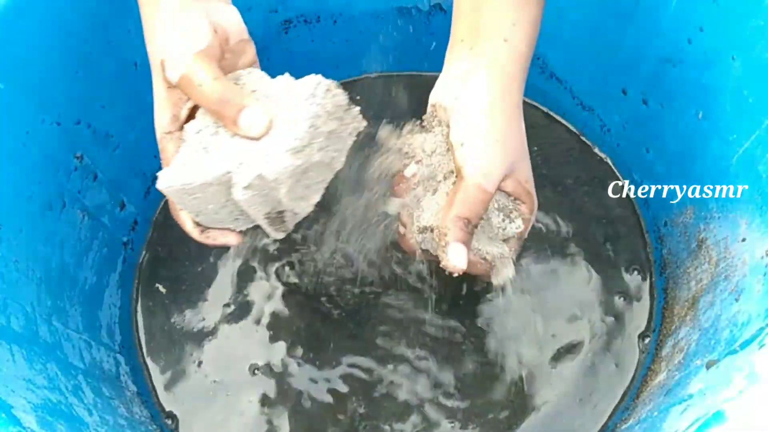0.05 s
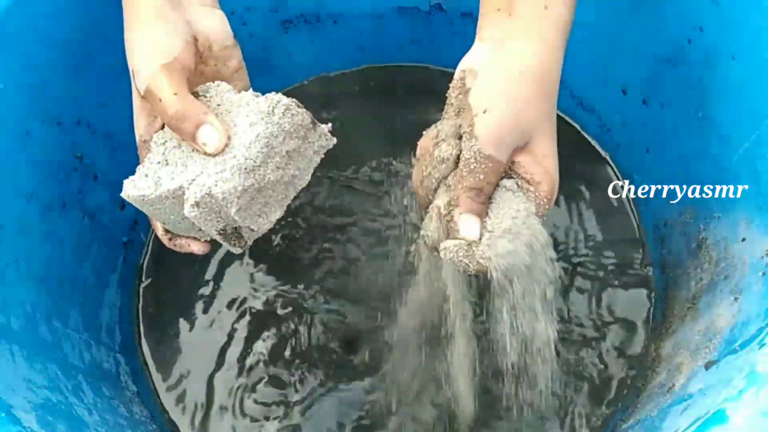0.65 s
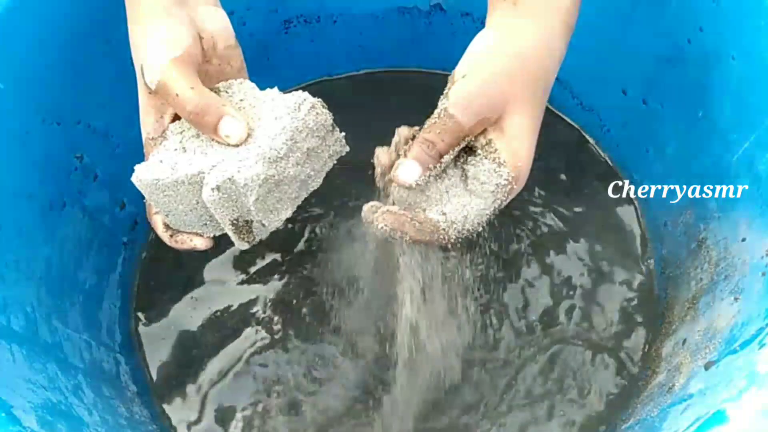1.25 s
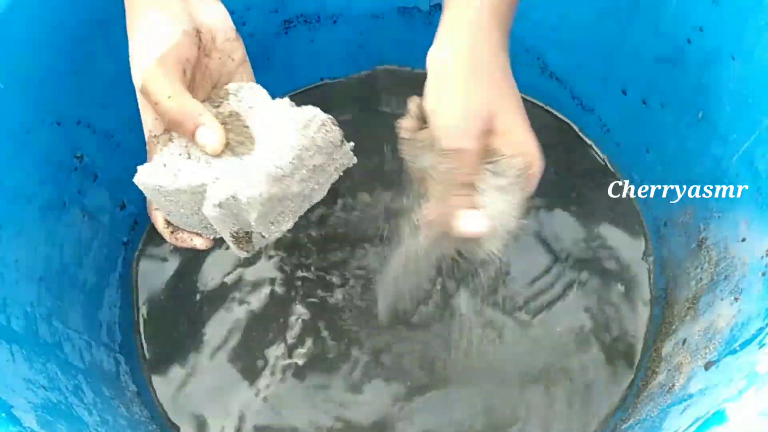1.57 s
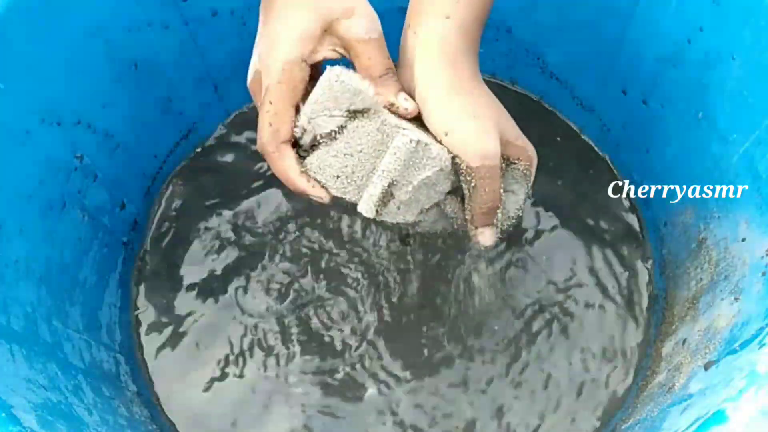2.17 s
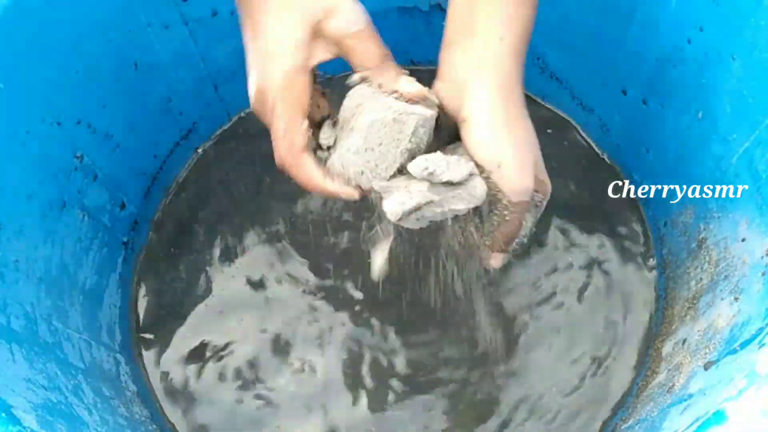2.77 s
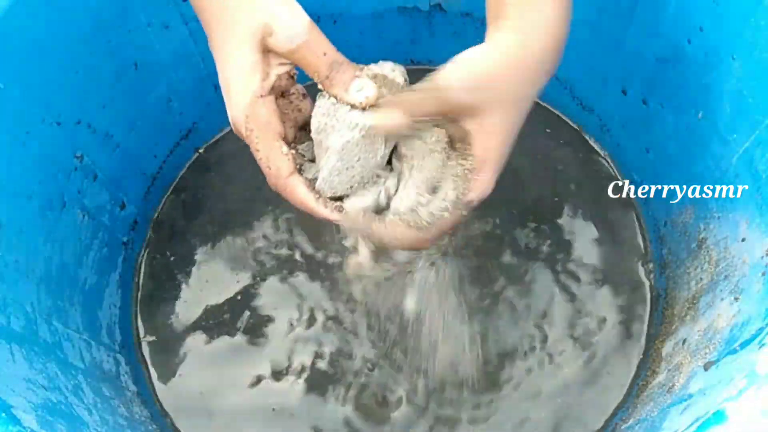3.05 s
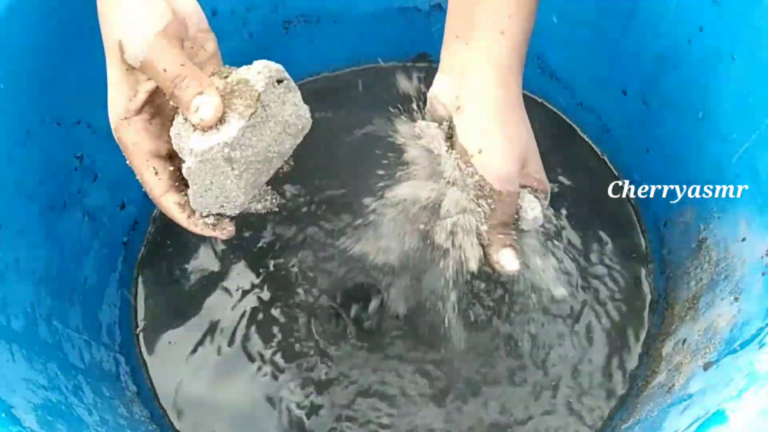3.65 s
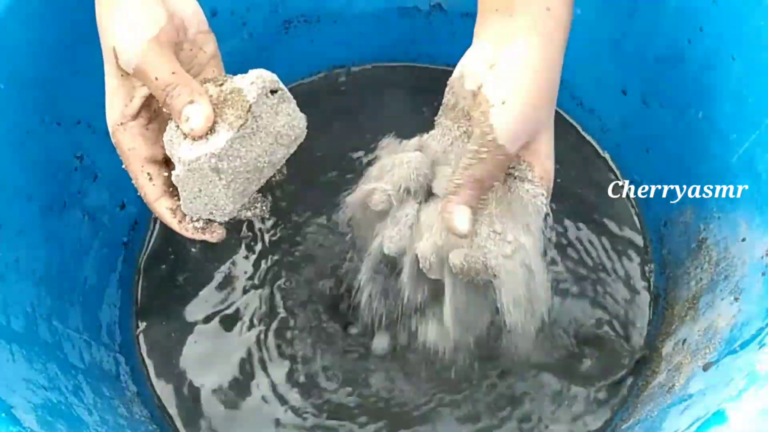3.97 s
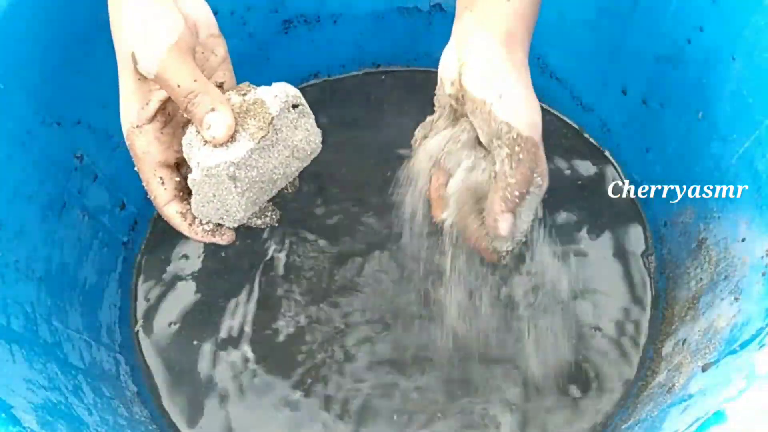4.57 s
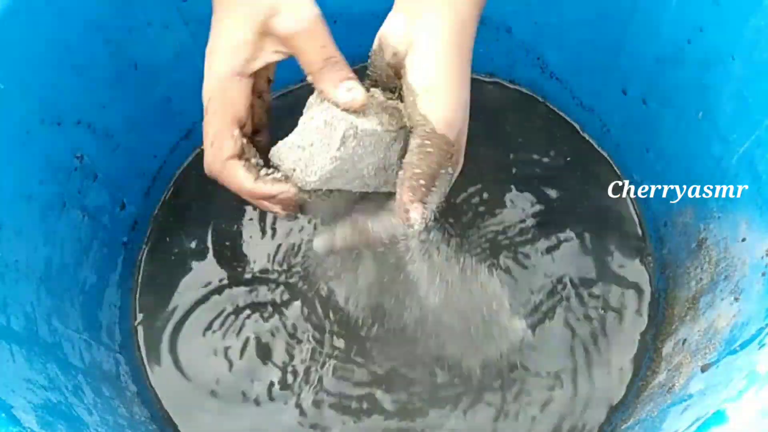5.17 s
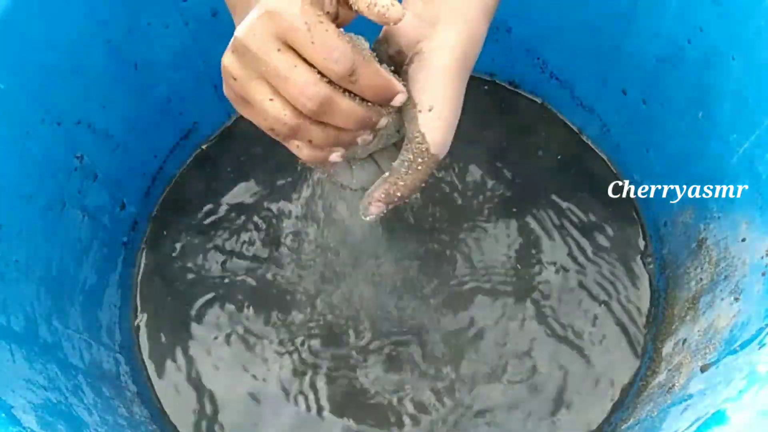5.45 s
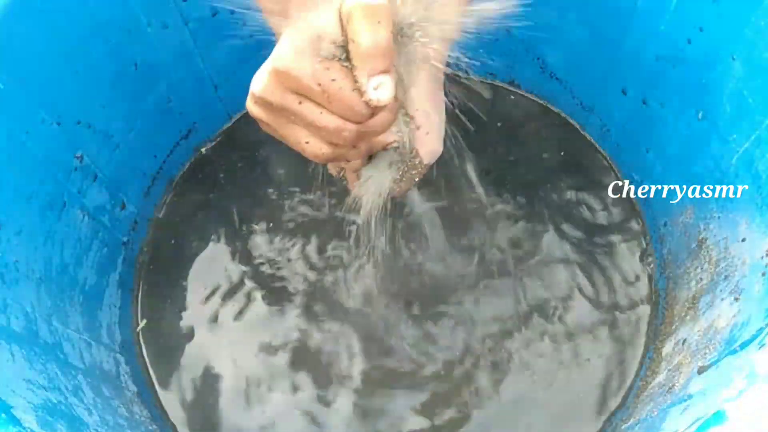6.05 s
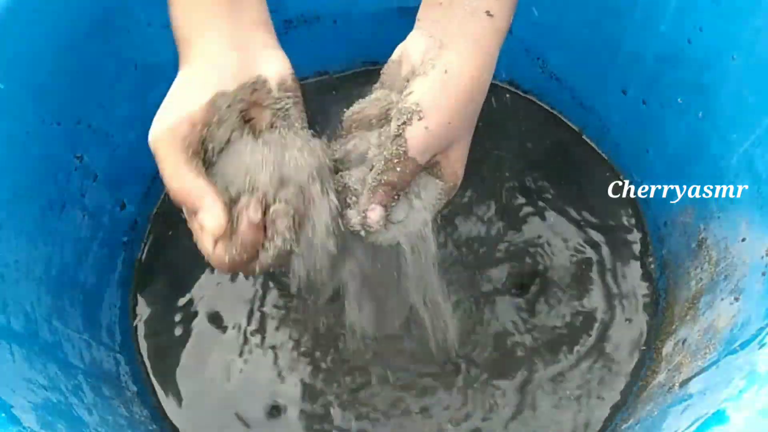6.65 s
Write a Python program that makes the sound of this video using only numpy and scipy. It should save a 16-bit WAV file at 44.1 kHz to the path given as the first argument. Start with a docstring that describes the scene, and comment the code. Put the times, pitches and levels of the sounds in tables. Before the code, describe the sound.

Hands crumble a block of sandy cement over a big plastic tub of water, close to the microphone. It opens with gritty crunches and sand pattering on the water. At about 0.4 seconds a large chunk slaps in and sets the tub booming, the loudest moment, and a lighter thump and plop follow at 0.6. Sand then falls in short fizzing pours, one with each squeeze, among tiny sharp snaps and crumbs plopping in. The sound thins around 2 seconds, and at 2.8 the block breaks with a short hollow knock. From 3.3 to 4.5 seconds the crunching, wet splats and rushes of sand grow busier. After a quieter stretch of trickling and scattered plops, more crunching and pouring run from about 5.8 seconds to the end, near 7. The tub adds a slight hollow echo, and a faint low outdoor rumble continues throughout.

```python
"""Sand patters and fizzes on water as hands crumble a block of sandy cement over a big plastic tub.
Almost at once a large chunk thumps the tub and sets it ringing, and a lighter one follows. Close to the
microphone the block crunches and snaps, each squeeze lets go more sand, and crumbs plop in, trapping
bubbles that ring. The tub's hollow echoes the crumbling and splashing over a low outdoor rumble."""
import sys
import numpy as np
from scipy import signal
from scipy.fft import rfft, irfft
from scipy.io import wavfile
from scipy.ndimage import uniform_filter1d

SR = 44100
rng = np.random.default_rng(int(sys.argv[2]) if len(sys.argv) > 2 else 0)


def log_audio(samples):
    """Write samples as a 16-bit WAV file to the path given in sys.argv[1]."""
    # one column per channel
    frames = np.atleast_2d(samples).T
    # limit to full scale, then quantise
    limited = np.clip(frames, -1, 1)
    pcm = np.round(limited * 32767).astype(np.int16)
    wavfile.write(sys.argv[1], SR, pcm)


N = 304731
T = np.arange(N) / SR


def undb(db):
    """Decibels to gain."""
    return 10 ** (np.asarray(db) / 20)


def unit(x):
    """Scale to rms 1."""
    return x / np.sqrt(np.mean(x ** 2) + 1e-18)


def seconds(length):
    """A time axis of the given length."""
    return np.arange(max(int(length * SR), 8)) / SR


def add(track, start, sound):
    """Mix a sound into the track at a start time in seconds."""
    i = int(np.clip(round(start * SR), 0, N - 1))
    track[i:i + len(sound)] += sound[:N - i]


def fade(t, t60):
    """Exponential decay by 60 dB in t60 seconds."""
    return np.exp(-np.log(1000) * t / max(t60, 1e-4))


def colour(x, points, size=1024):
    """Causal filter of unit energy with the given (Hz, dB) spectrum; the tail is kept."""
    hz, db = np.transpose(points)
    bin_hz = np.fft.rfftfreq(size, 1 / SR)
    curve_db = np.interp(np.log(bin_hz + 1), np.log(hz), db)
    cepstrum = irfft(np.log(undb(curve_db)))
    cepstrum[1:size // 2] *= 2  # fold to minimum phase, so attacks stay sharp
    cepstrum[size // 2 + 1:] = 0
    response = irfft(np.exp(rfft(cepstrum)))
    return signal.fftconvolve(x, response / np.linalg.norm(response))


def walk(rate):
    """Smooth random wandering at rms 1, with rate turns a second."""
    hold = max(int(SR / rate), 2)
    steps = np.repeat(rng.standard_normal(N // hold + 1), hold)
    return unit(uniform_filter1d(steps, hold)[:N])


def grains(n, rate, spread_db):
    """Random clicks, many small and a few large, at rms 1; the rate may change with time."""
    falls = rng.random(n) < rate / SR
    sizes = undb(spread_db * np.minimum(rng.exponential(size=n), 6))
    return unit(falls * sizes * rng.choice([-1, 1], n) / np.sqrt(rate))


def burst(length, points, rate=9000, spread_db=2, vary_db=3):
    """A quick swell of clicks; no two bursts have quite the same colour."""
    t = seconds(3 * length)
    age = t / (0.36 * length)  # 1 at the crest
    spectrum = [(hz, db + vary_db * rng.standard_normal()) for hz, db in points]
    return colour(age * np.exp(1 - age) * grains(len(t), rate, spread_db), spectrum)


def ping(hz, ring, glide, onset, hold=1.695):
    """A ring that dies ever faster; with glide it rises in pitch like a bubble nearing the surface."""
    t = seconds(ring)
    phase = 2 * np.pi * hz * (t + glide * t ** 2 / (2 * ring))
    decay = np.exp(-np.log(1000) * (t / ring) ** hold)
    return np.sin(phase) * decay * (1 - np.exp(-t / onset))


# The tub's hollow tone. Each row: pitch in Hz, level in dB, seconds to fall 60 dB.
AIR_MODES = [(570, -1.5, 0.051), (954, -1, 0.075), (1225, -9, 0.12), (1516, 4.5, 0.011), (1940, 6, 0.0085)]


def hollow(t):
    """The ring of the air between the water and the wall."""
    return sum(undb(db) * np.cos(2 * np.pi * hz * t) * fade(t, t60) for hz, db, t60 in AIR_MODES)


# The bass-heavy outdoor bed. Each row: frequency in Hz, relative level in dB.
RUMBLE_SPECTRUM = [(20, -17), (33, -11.5), (52, -1.5), (85, 2.5), (115, -6), (145, -2.5), (210, -10),
                   (268, -8), (320, -17), (410, -28), (570, -22), (780, -34), (1200, -31.5), (3000, -43.5),
                   (10000, -44), (16000, -57)]


def outdoors(rumble_db=-40, hollow_db=-65, whine_hz=1225, whine_db=-63.5):
    """A low rumble booms in the tub and the hollow hums; a faint thin whine swells and eases."""
    rumble = unit(colour(rng.standard_normal(N), RUMBLE_SPECTRUM, size=8192)[:N])
    rumble *= undb(0.8 * walk(5))
    air = unit(signal.fftconvolve(rng.standard_normal(N), hollow(seconds(.5)))[:N])
    whine = np.sin(2 * np.pi * np.cumsum(whine_hz + 4 * walk(26)) / SR)
    whine *= np.interp(T, [1.2, 1.8, 3.3, 3.9], [0.36, 0.9, 1.0, 0.6])
    return undb(rumble_db) * rumble + undb(hollow_db) * air + undb(whine_db) * whine


def tub_echo(x, hollow_db=-47, tail_db=-15, tail_t60=0.019):
    """Near walls give air resonances and a short diffuse tail."""
    t = seconds(.15)
    tail = rng.standard_normal(len(t)) * fade(t, tail_t60) * (t > .003)
    response = undb(tail_db) * tail / np.linalg.norm(tail) + undb(hollow_db) * hollow(t)
    response[0] += 1  # the direct sound
    return signal.fftconvolve(x, response)[:N]


# One pour of sand for each squeeze of the hand. Each row: start in seconds, hold in seconds, flow in dB.
SAND_POURS = [(0.0, 0.089, -51), (0.274, 0.13, -52), (0.471, 0.081, -54.5), (0.67, 0.18, -55.5),
              (0.879, 0.2, -55.5), (1.36, 0.12, -63), (1.558, 0.13, -60.5), (1.95, 0.17, -61),
              (2.5, 0.023, -59), (2.639, 0.087, -62.5), (2.8, 0.11, -59.5), (3.03, 0.36, -64),
              (3.32, 0.2, -57.5), (3.499, 0.44, -53.5), (4.069, 0.04, -60.5), (4.229, 0.2, -55),
              (4.382, 0.19, -59), (4.68, 0.13, -70), (4.98, 0.24, -69.5), (5.37, 0.082, -64),
              (5.66, 0.24, -69), (5.87, 0.045, -57.5), (5.981, 0.18, -58), (6.272, 0.14, -51.5),
              (6.47, 0.14, -56), (6.719, 0.16, -55)]
FULL_FLOW_DB = -53.5


def sand_flow(attack_s=0.036, release_t60=0.21, dribble_db=-83):
    """The flow of sand, 1 for a full stream: each pour swells, holds and dies away to a dribble."""
    power = undb(dribble_db) ** 2
    for start, held, db in SAND_POURS:
        swell = np.clip(1 + (T - start) / attack_s, 0, 1)
        release = fade(np.maximum(T - start - held, 0), release_t60)
        power = power + (undb(db) * swell * release) ** 2
    return np.sqrt(power) / undb(FULL_FLOW_DB)


def stream(level, points, rate, spread_db, full_db=-54):
    """A stream of sand: a full one merges into hiss, a thin one parts into single grains."""
    grains_per_s = rate * (level / undb(full_db)) ** 1.2
    return level * colour(grains(N, grains_per_s, spread_db), points)[:N]


def small_bubbles(count, low_hz, high_hz, spread_db, cycles):
    """Coarse grains trap little bubbles of every size; the higher ones are fainter."""
    out = np.zeros(N)
    for when, pitch, strength in rng.random((count, 3)):
        hz = low_hz * (high_hz / low_hz) ** pitch
        db = -spread_db * np.log(strength + 0.094) - 6 * pitch
        add(out, when * N / SR, undb(db) * ping(hz, cycles / hz, glide=0.22, onset=0.000078))
    return unit(out)


# Three colours of sand on water: broad patter, airy trickle and wet midrange fizz.
# Each row: frequency in Hz, relative level in dB.
PATTER_SPECTRUM = [(600, -33), (1150, 1), (1550, 2.5), (2300, 0), (2900, -0.5), (4000, -0.5), (5200, 2),
                   (6500, -2), (8000, -11), (12000, -13), (16000, -28)]
TRICKLE_SPECTRUM = [(2000, -32.5), (5000, -15), (7500, 2), (9500, 3.5), (11000, -3), (13000, -18),
                    (16000, -33)]
FIZZ_SPECTRUM = [(350, -1.5), (560, 4.5), (780, -4), (960, 4), (1150, 0), (1600, -1), (2100, -4.5),
                 (2900, -10), (5000, -30.5)]


def sand(trickle_db=-59, fizz_db=-54, bubbles_db=-58, pings_db=-68, crackle_db=-68, clump_db=2.5):
    """Sand trickles off the fingers in clumps, patters on the water and makes it fizz and crackle."""
    flow = sand_flow()
    trickle, fizz, crackle = flow ** 0.52, flow ** 0.65, flow ** 0.26  # these linger as the stream thins
    out = stream(undb(FULL_FLOW_DB) * flow, PATTER_SPECTRUM, rate=9000, spread_db=3)
    out += stream(undb(trickle_db) * trickle, TRICKLE_SPECTRUM, rate=7000, spread_db=3)
    out += stream(undb(fizz_db) * fizz, FIZZ_SPECTRUM, rate=9000, spread_db=5.5)
    out *= undb(clump_db * walk(70))
    bubbles = small_bubbles(count=600, low_hz=1250, high_hz=3600, spread_db=4, cycles=16)
    pings = small_bubbles(count=900, low_hz=3900, high_hz=13000, spread_db=7, cycles=14)
    pops = small_bubbles(count=420, low_hz=4370, high_hz=12800, spread_db=9, cycles=25)
    out += undb(bubbles_db) * flow * bubbles
    out += undb(pings_db) * trickle * pings
    return out + undb(crackle_db) * crackle * pops


# Whole sheets of sand landing on the water. Each row: start in seconds, length in seconds, level in dB.
SAND_SHEETS = [(0.766, 0.35, -52.5), (1.476, 0.28, -50.5), (3.557, 0.37, -54), (4.316, 0.37, -51.5)]
# Their wet wash. Each row: frequency in Hz, relative level in dB.
RUSH_SPECTRUM = [(700, -9), (1200, 2.5), (1600, 6.5), (2100, -4), (3200, -6.5), (4300, -2.5), (5500, -1),
                 (6800, -7), (8000, -13), (10500, -11), (15000, -35)]


def rushes(swell_s=0.096, stop_s=0.072, flutter_db=1.5):
    """So many grains land at once that they merge into a smooth, wet rush."""
    level = np.zeros(N)
    for start, length, db in SAND_SHEETS:
        swell = np.clip((T - start) / swell_s, 0, 1)
        stop = np.clip((start + length - T) / stop_s, 0, 1)
        level += undb(db) * swell * stop
    flutter = undb(flutter_db * walk(40))
    return level * flutter * colour(rng.standard_normal(N), RUSH_SPECTRUM)[:N]


def stray_grit(count=190, db=-51, spread_db=5, tick_s=0.0018, low_hz=2900, flow_slope=0.29):
    """Single grains rub loose between the fingers and tick; fainter when little sand pours."""
    out, flow = np.zeros(N), sand_flow()
    for when, faintness, pitch in rng.random((count, 3)):
        hz = low_hz * 2 ** (2 * pitch)
        gain = undb(db - spread_db * np.log(faintness + .1)) * flow[int(when * N)] ** flow_slope
        add(out, when * N / SR, gain * burst(tick_s, [(hz / 2, -10), (hz, 0), (hz * 2, -20)]))
    return out


# The fist grinds a lump and sheds wet clots.
# Each row: start in seconds, length in seconds, typical splat level in dB.
FIST_GRINDS = [(0.659, 0.5, -55.5), (3.559, 0.4, -48.5), (6.24, 0.66, -50)]


def clots(per_s=42, spread_db=5.5, splat_s=0.0043, ring_db=8, ring_hz=1750, ring_s=0.0094):
    """Wet clots hit the water at uneven moments, each a gritty splat with a short ring."""
    out = np.zeros(N)
    for start, length, db in FIST_GRINDS:
        count = int(length * per_s)
        for k, (when, size, pitch) in enumerate(rng.random((count, 3))):
            at = start + (k + 2 * when) / per_s
            gain = undb(db + spread_db * (2 * size - 1))
            add(out, at, gain * burst(splat_s, PATTER_SPECTRUM))
            bubble = ping(ring_hz * 2 ** (pitch - .5), ring_s, glide=.2, onset=.0001)
            add(out, at, gain * undb(ring_db) * bubble)
    return out


# Grains of cement snapping off between the fingers. Each row: start in seconds, pitch in Hz, level in dB.
GRAIN_SNAPS = [(0.352, 10800, -27), (0.499, 4250, -27), (0.709, 7800, -32), (0.902, 13000, -36),
               (0.994, 12400, -34), (1.053, 8340, -36), (1.157, 5860, -36), (1.181, 12500, -36),
               (1.357, 5340, -34), (1.681, 3270, -37), (1.876, 4450, -35), (2.019, 7740, -35),
               (2.053, 6200, -36), (2.154, 3100, -34), (2.454, 6200, -33.5), (2.535, 6370, -38),
               (3.318, 9500, -36), (3.79, 7900, -23), (3.912, 9700, -36), (3.988, 5730, -37.5),
               (4.088, 5640, -30), (4.249, 9990, -34), (4.719, 5700, -37), (4.794, 6300, -31.5),
               (5.758, 4300, -36), (6.459, 7900, -36), (6.883, 4640, -30.5)]


def snaps(ring_s=0.0017, crack_db=-13, crack_s=0.0035, skirt_db=-13):
    """A grain breaks free with a tiny ring and a spray of cracks around the same pitch."""
    out = np.zeros(N)
    for start, hz, db in GRAIN_SNAPS:
        add(out, start, undb(db) * ping(hz, ring_s, glide=0, onset=0.00003))
        band = [(hz / 2, skirt_db), (hz, 0), (hz * 2, skirt_db)]
        add(out, start, undb(db + crack_db) * burst(crack_s, band))
    return out


def block_break(start_s=2.7925, hz=270, db=-23, ring_s=0.03):
    """The block breaks in two with a short, hollow knock between the cupped hands."""
    out = np.zeros(N)
    add(out, start_s, undb(db) * ping(hz, ring_s, glide=0, onset=0.00095))
    return out


# The bright edge of breaking grit. Each row: frequency in Hz, relative level in dB.
GRIT_SPECTRUM = [(800, -2.5), (2000, 2.5), (3500, 3), (6000, 3), (7500, -2), (9500, 0), (12000, -9.5),
                 (16000, -27)]
# The block gives way, or a pinch of it lands.
# Each row: start in seconds, length in seconds, level in dB, body offset in dB, both before the trims.
GRIT_BURSTS = [(0.165, 0.024, -47.5, -2), (0.208, 0.021, -47, 5.5), (0.262, 0.012, -37, 3.5),
               (0.349, 0.0059, -39, 8), (0.44, 0.0099, -57, 19), (0.458, 0.0065, -51, 21),
               (0.505, 0.004, -45, 15), (0.553, 0.0036, -41, 11), (0.995, 0.0023, -42, 11),
               (1.18, 0.0086, -51, 9.5), (1.353, 0.026, -52, 9), (1.445, 0.018, -47.5, 4.5),
               (2.067, 0.0051, -37, -12), (2.326, 0.03, -39.5, -23), (3.43, 0.014, -43, -14),
               (3.493, 0.013, -35, -5), (3.545, 0.0097, -41.5, 4), (3.694, 0.013, -40, -5),
               (3.745, 0.0075, -44, 5), (3.789, 0.0022, -43.5, 10), (4.043, 0.0053, -46.5, 4),
               (4.189, 0.002, -32.5, 4), (5.23, 0.062, -72.5, 18), (5.384, 0.0012, -38, -1),
               (5.783, 0.013, -50, 0), (5.851, 0.039, -44.5, 6), (6.11, 0.012, -37, -5.5),
               (6.233, 0.0088, -39.5, -2), (6.371, 0.016, -43.5, -3), (6.4, 0.018, -45, 9.5),
               (6.744, 0.0021, -40.5, 6)]


def crunches(treble_trim_db=2, body_trim_db=-0.5, snap_db=2, plain_s=0.011):
    """Bonds between sand grains break in bursts with a wet, hollow body; the shortest are brightest."""
    out = np.zeros(N)
    for start, length, db, body_db in GRIT_BURSTS:
        tilt = snap_db * max(np.log2(plain_s / length), 0)  # dB per octave
        grit = [(hz, level + tilt * np.log2(hz)) for hz, level in GRIT_SPECTRUM]
        add(out, start, undb(db + treble_trim_db) * burst(length, grit))
        add(out, start, undb(db + body_db + body_trim_db) * burst(length, FIZZ_SPECTRUM))
    return out


# The boom of the filled tub. Each row: pitch in Hz, relative level in dB, full ring time (t60) in seconds.
BODY_MODES = [(54.4, -18.5, 1), (142.5, -4, 0.28), (183, -7, 0.2), (278, -13.5, 0.22), (314, -17, 0.26),
              (379, -14, 0.19), (442, -7, 0.12), (507, -14.5, 0.14)]
# The dull slap on the water. Each row: frequency in Hz, relative level in dB.
SLAP_SPECTRUM = [(40, -46), (150, 4), (400, 14.5), (800, -7), (1500, -5), (2100, -9), (3000, -10),
                 (4500, -20.5), (8000, -38)]
# Heavy chunks landing. Each row: start in seconds, boom level in dB, contact time in seconds,
# share of the full ring time, slap level in dB.
CHUNK_HITS = [(0.3715, -4, 0.00096, 0.91, -12), (0.6272, -17.5, 0.0023, 0.44, -26.5)]


def knocks(slap_t60=0.078):
    """A heavy piece slaps the water and sets the whole tub ringing."""
    out, t = np.zeros(N), seconds(0.47)
    for start, db, contact, ring_share, slap_db in CHUNK_HITS:
        boom = np.zeros(len(t))
        for hz, mode_db, t60 in BODY_MODES:
            build_up = 1 - np.exp(-np.pi * hz * t)  # within the first cycle
            boom += undb(mode_db) * np.sin(2 * np.pi * hz * t) * build_up * fade(t, t60 * ring_share)
        push = np.hanning(len(seconds(contact)))  # a longer contact gives a duller thump
        add(out, start, -undb(db) * np.convolve(boom, push / push.sum()))
        slap = colour(rng.standard_normal(len(t)) * fade(t, slap_t60), SLAP_SPECTRUM)
        add(out, start, undb(slap_db) * slap)
    return out


def wobble(x, depth, wobble_s=0.0013):
    """Churning water makes a ring swell and dip unevenly."""
    churn = uniform_filter1d(rng.standard_normal(len(x)), max(int(wobble_s * SR), 2))
    return x * (1 + depth * unit(churn))


# Crumbs and droplets plopping in. Each row: start in seconds, bubble pitch in Hz, level in dB,
# ring time in seconds, rise over the ring as a share of the pitch.
CRUMB_PLOPS = [(0.0105, 1630, -35.5, 0.02, 0.15), (0.2645, 1430, -30.5, 0.013, 0.5),
               (0.3364, 1890, -25, 0.006, 0.35), (0.3733, 1290, -8, 0.0038, 0.34),
               (0.3719, 687, -12, 0.022, 1.48), (0.4617, 900, -34.5, 0.037, 0.15),
               (0.488, 1670, -20, 0.0038, 0.0057), (0.5087, 940, -24, 0.0069, 0.26),
               (0.5095, 1800, -25, 0.0028, 0.37), (0.5458, 1210, -32, 0.012, 0.06),
               (0.6072, 1450, -27.5, 0.023, 0.098), (0.6278, 1020, -15.5, 0.014, 0.3),
               (0.6291, 1790, -20, 0.0055, 0.088), (0.63, 507, -4, 0.018, 0.049),
               (0.8548, 2150, -33.5, 0.0075, 0.25), (1.028, 2310, -19.5, 0.0038, 0.41),
               (1.047, 980, -24, 0.008, 0.077), (1.0707, 1580, -30.5, 0.024, 0.41),
               (1.079, 1620, -26.5, 0.0082, 0.34), (1.111, 1510, -24.5, 0.0071, 0.21),
               (1.1299, 1720, -27.5, 0.0043, 0.1), (1.1828, 3640, -36.5, 0.0087, 0.14),
               (1.21, 4570, -38, 0.008, 0), (1.2174, 1480, -22, 0.0053, 0), (1.2182, 513, -22.5, 0.013, 0),
               (1.353, 970, -34, 0.013, 0.23), (1.4032, 1710, -31.5, 0.016, 0.071),
               (1.846, 1560, -35.5, 0.0098, 0.096), (1.9565, 2030, -32.5, 0.0052, 0.35),
               (2.034, 1620, -34.5, 0.0067, 0.31), (2.0692, 2090, -26.5, 0.0033, 0.67),
               (2.4559, 2040, -26.5, 0.0045, 0), (2.5288, 3000, -39.5, 0.0057, 0.094),
               (2.6241, 1760, -39, 0.017, 0.096), (3.0347, 2020, -35, 0.0071, 0.36),
               (3.0509, 1605, -19.5, 0.013, 0.23), (3.212, 2400, -32, 0.0055, 0.37),
               (3.2388, 2270, -36.0, 0.0032, 0.35), (3.309, 1950, -32, 0.004, 0.1),
               (3.3185, 1520, -15.5, 0.0052, 0.33), (3.3364, 1280, -17.5, 0.0096, 0.18),
               (3.338, 493, -17, 0.015, 0), (3.415, 2020, -27, 0.0043, 0.13),
               (3.4372, 1720, -28, 0.0071, 0.18), (3.5246, 1076, -25.5, 0.016, 0),
               (3.712, 852, -26, 0.031, 0.0038), (3.7342, 1580, -34, 0.0088, 0.7),
               (3.894, 1310, -23.5, 0.0079, 0), (3.9112, 1830, -23, 0.0024, 0.57),
               (3.9749, 1240, -39.5, 0.02, 0), (4.086, 1730, -28.5, 0.011, 0),
               (4.19, 1420, -18.5, 0.0053, 0), (4.249, 1570, -30, 0.0053, 0.2),
               (4.2644, 2100, -32, 0.012, 0.26), (4.267, 833, -23.5, 0.024, 0),
               (4.336, 1490, -22, 0.0058, 0.29), (4.3717, 2360, -27, 0.0049, 0.31),
               (4.6204, 2290, -33.0, 0.012, 0), (4.9145, 2070, -31.5, 0.0077, 0.32),
               (5.102, 1640, -31.5, 0.0055, 0.16), (5.237, 2370, -37.5, 0.0036, 0.38),
               (5.3504, 2400, -42, 0.02, 0.1), (5.3852, 1260, -24, 0.0067, 0.02),
               (5.4788, 1030, -22, 0.021, 0.082), (6.1126, 1540, -25.5, 0.0087, 0.24),
               (6.1428, 1590, -36, 0.026, 0.25), (6.3251, 970, -13.5, 0.01, 0.057),
               (6.3448, 1470, -22, 0.0037, 0.0024), (6.418, 950, -32, 0.018, 0),
               (6.4715, 1630, -19.5, 0.004, 0), (6.6501, 1047, -25, 0.014, 0.2),
               (6.6507, 470, -23, 0.021, 0), (6.714, 1640, -30, 0.0031, 0.41),
               (6.746, 1670, -31.5, 0.0077, 0.32), (6.8306, 2480, -34.5, 0.0044, 0.51)]


def plops():
    """Each crumb ticks, splashes, traps a bubble and a smaller twin, and leaves a crater to gulp shut."""
    onset_s, onset_hz, muffle_db = 0.0001, 1500, 5
    wall_near_s, wall_far_s, wall_db = 0.00268, 0.00459, -9.5
    twin_db, twin_ratio, twin_lag_s = -13, 1.165, 0.00402
    crater_db, crater_hz, crater_s = -17, 600, 0.015
    splash_db, splash_s = -16.5, 0.0063
    typical_plop_db, typical_tick_db, tick_slope, tick_s = -23, -43, 0.88, 0.0022
    lead_db, lead_s = -23, 0.0033
    out, chances = np.zeros(N), rng.random((len(CRUMB_PLOPS), 4))
    for (start, hz, db, ring, glide), (detune, lag, place, crater) in zip(CRUMB_PLOPS, chances):
        # big bubbles pinch off later and deeper, with less tick and splash
        onset = onset_s * (onset_hz / hz) ** 3
        surface_db = db + muffle_db * min(np.log2(hz / onset_hz), 0)
        plink = undb(db) * wobble(ping(hz, ring, glide, onset), depth=0.2)
        add(out, start, plink)
        # the wall throws the plop back, sooner or later depending on where the crumb lands
        echo_s = wall_near_s + place * (wall_far_s - wall_near_s)
        add(out, start + echo_s, undb(wall_db) * plink)
        twin = ping(hz * (twin_ratio + 0.3 * detune), ring, glide=0.22, onset=onset)
        add(out, start + twin_lag_s * lag, undb(db + twin_db) * twin)
        gulp = ping(crater_hz * 2 ** (crater - .5), crater_s, glide, onset=twin_lag_s / 2)
        add(out, start, undb(surface_db + crater_db) * gulp)
        add(out, start, undb(surface_db + splash_db) * burst(splash_s, FIZZ_SPECTRUM))
        tick_db = typical_tick_db + tick_slope * (surface_db - typical_plop_db)
        add(out, start, undb(tick_db) * burst(tick_s, GRIT_SPECTRUM))
        # a faint, short hiss leads into each plop and softens its attack
        add(out, start - lead_s, undb(tick_db + lead_db) * burst(lead_s, PATTER_SPECTRUM))
    return out


def scene():
    """Everything that happens in the tub, over the outdoor bed, in mono."""
    crumbling = plops() + crunches() + snaps() + stray_grit() + block_break()
    falling_sand = sand() + clots() + rushes()
    return (tub_echo(crumbling + falling_sand) + knocks() + outdoors())[None]


def record(dry, low_cut_hz=36, top_hz=15450):
    """The deepest bass is cut away and the loudest peak is rounded; the recorder cuts the top."""
    low_cut = signal.butter(2, low_cut_hz, "high", fs=SR, output="sos")
    high_cut = signal.ellip(10, .2, 70, top_hz, fs=SR, output="sos")
    rounded = np.tanh(signal.sosfilt(low_cut, dry))
    return signal.sosfilt(high_cut, rounded)


dry = scene()
out = record(dry)
log_audio(out)
```